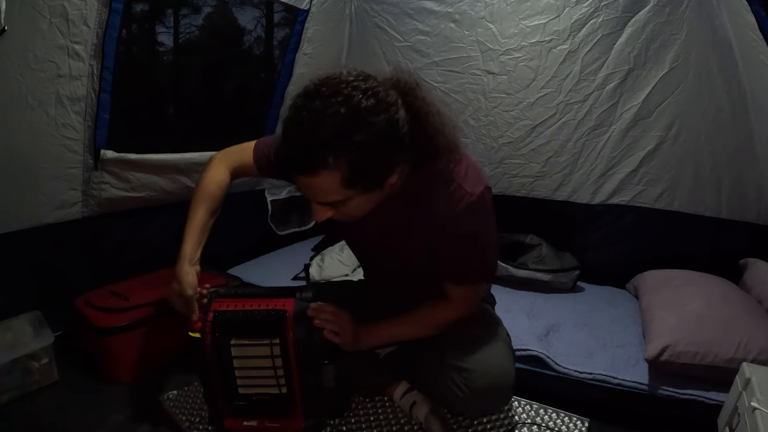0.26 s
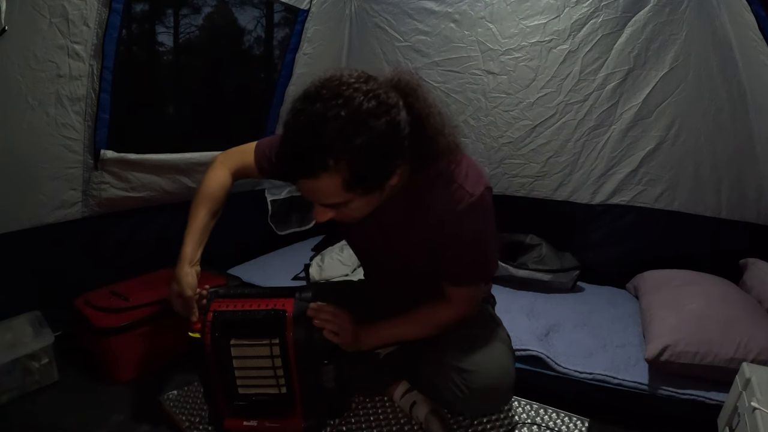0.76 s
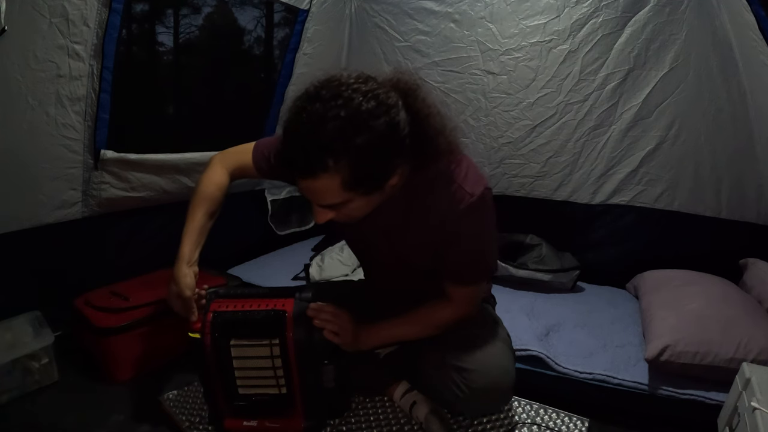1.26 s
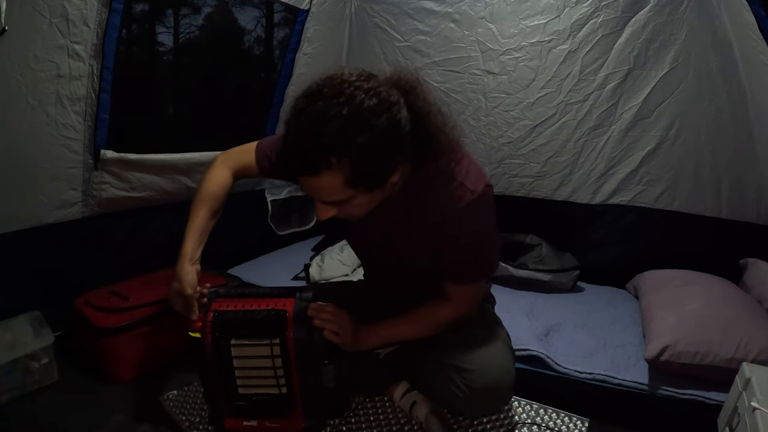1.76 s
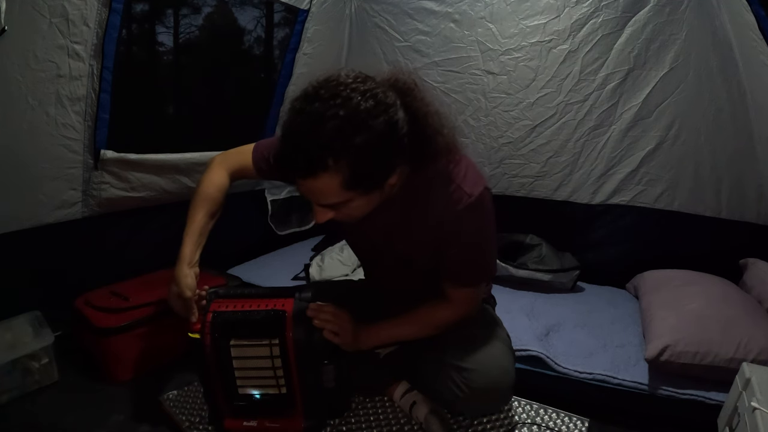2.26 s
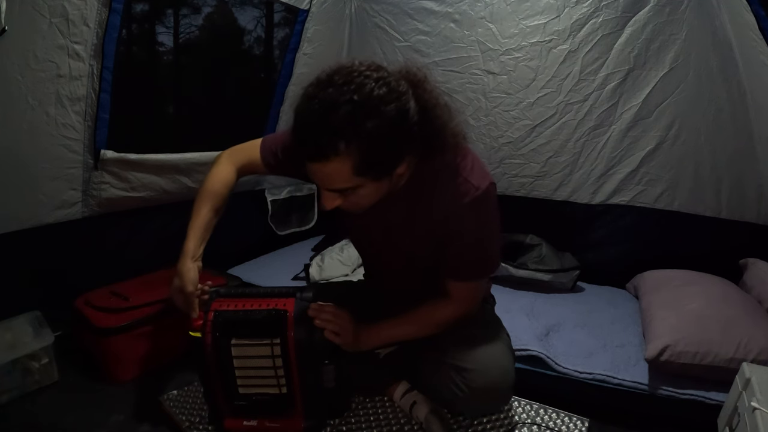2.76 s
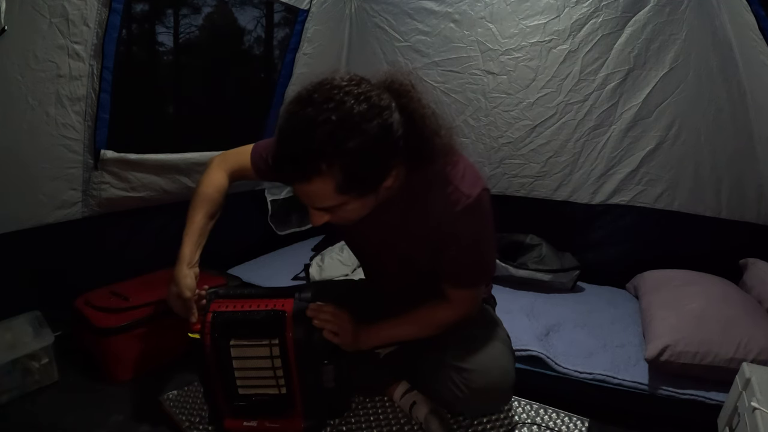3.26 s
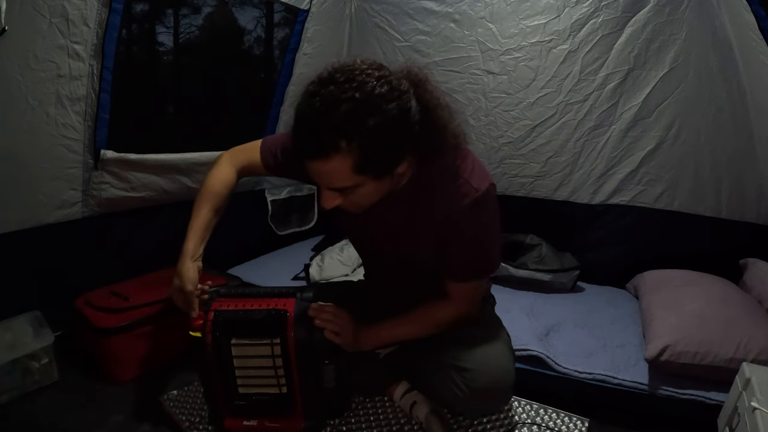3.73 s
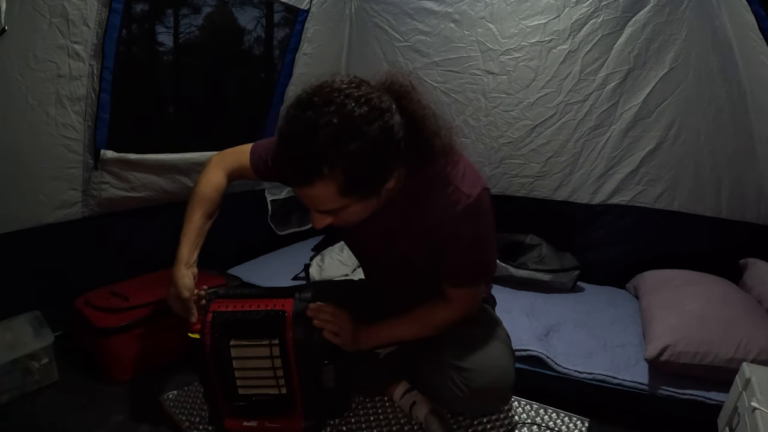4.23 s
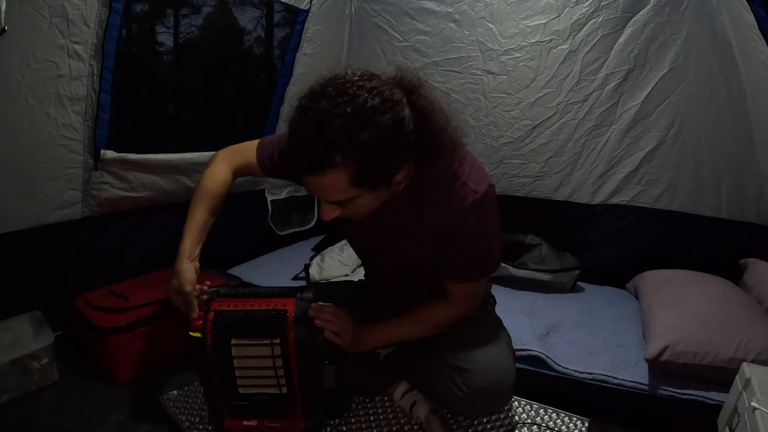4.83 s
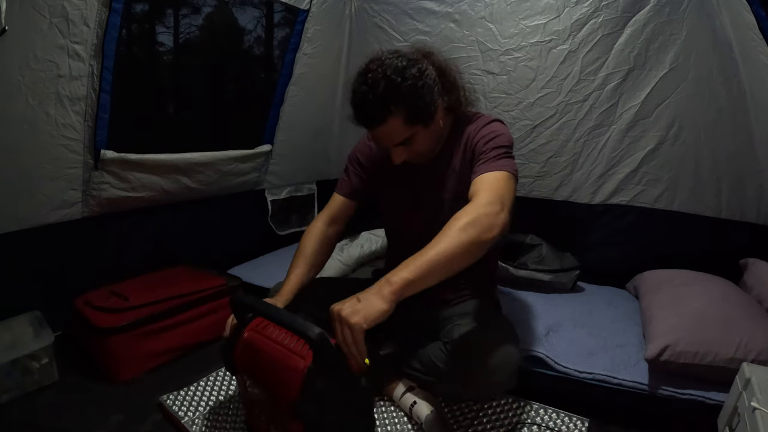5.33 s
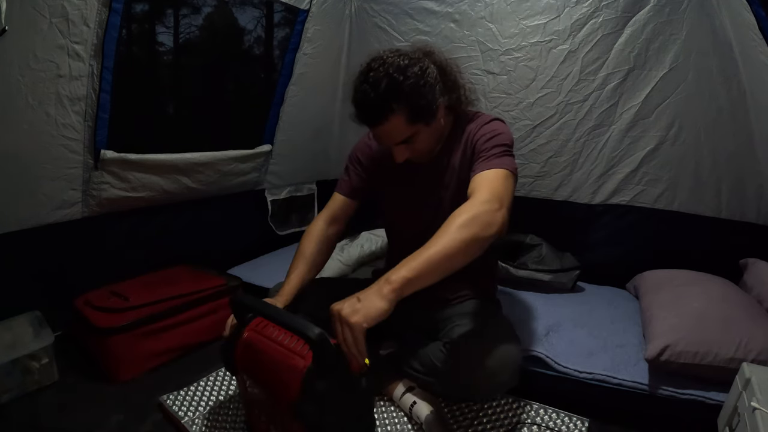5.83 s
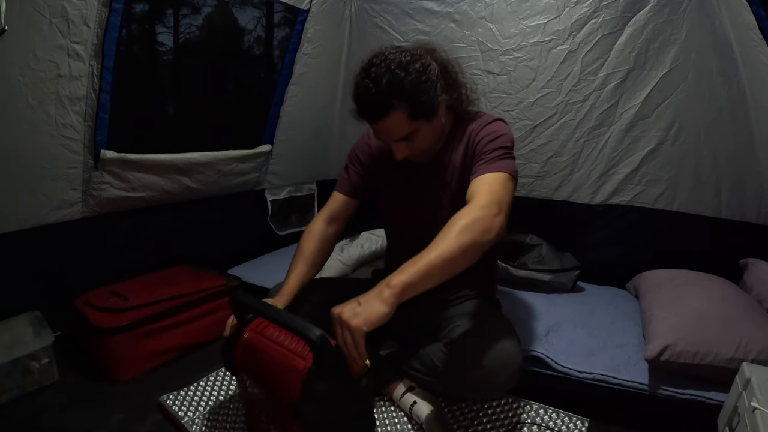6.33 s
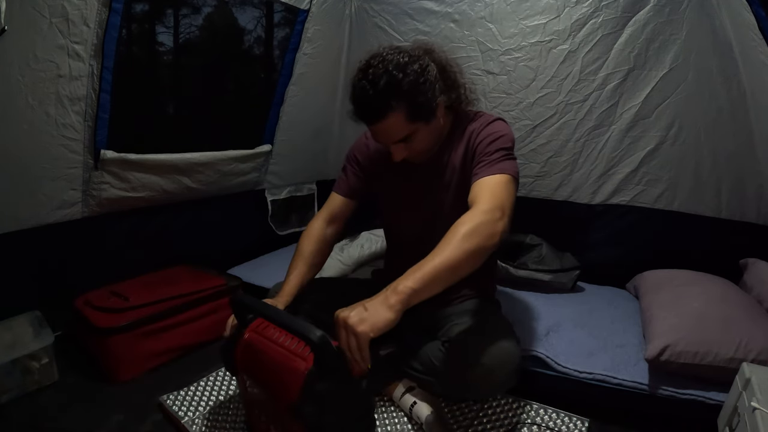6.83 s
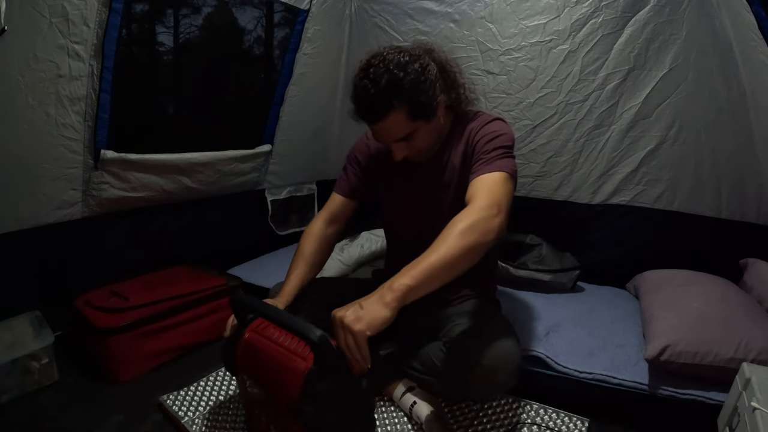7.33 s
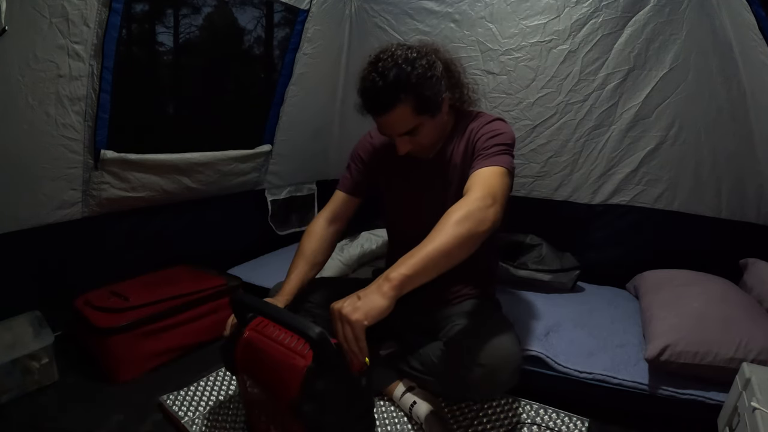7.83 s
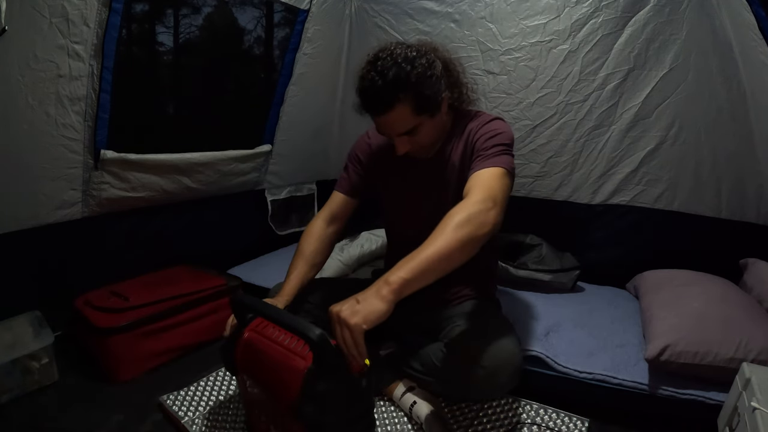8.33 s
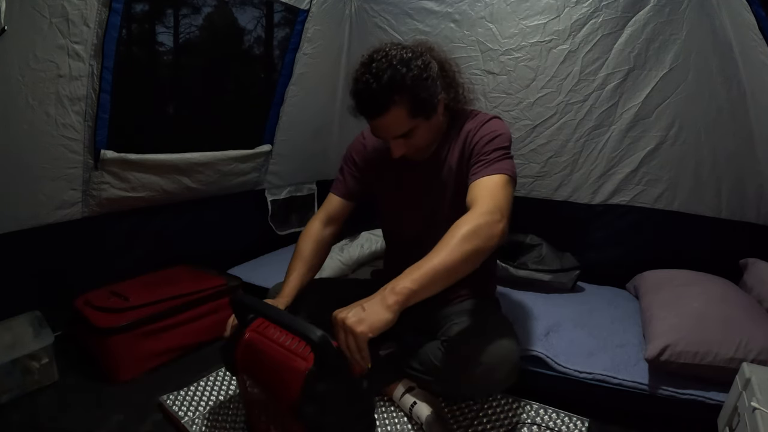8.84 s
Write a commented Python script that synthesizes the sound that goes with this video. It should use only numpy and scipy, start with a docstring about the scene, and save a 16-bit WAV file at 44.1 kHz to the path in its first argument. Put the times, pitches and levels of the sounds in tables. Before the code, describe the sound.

A quiet tent at night, with only faint air noise and a trace of low rumble. A portable gas heater close ahead opens with its button clacking back at 0 s. Then the igniter is pressed: a small tick at 0.3 s, a sharp loud snap at 0.43 s with a brief bright metallic ring and a dull low thud, very faint gas hiss, and a scraping clack of release at 0.93 s. This repeats with snaps near 1.4, 2.3, 3.2, 4.2 and 5.1 s, each followed half a second later by a hollow button clack. The heater is turned around 5.4 s; snaps at 5.5, 6.1, 6.8, 7.5, 8.1 and 8.8 s come faster, ringing with a changed metallic colour, and the returning button is much softer. Thin ringing fades quickly in the dry space; the last faint hiss runs to the end, about 9 s.

```python
"""Piezo igniter in a quiet tent

The igniter of a portable gas heater is pressed twelve times. The button ticks in through tiny slips,
the hammer snaps and rings modes of shell, casing and wire guard, and the button thuds home (noise burst).
Filtered noise hisses as gas until the button scrapes back and clacks; the last hiss runs to the end.
Half way through, the heater is turned and rings differently. Faint air noise and rumble lie beneath."""
import sys
import numpy as np
from scipy import signal
from scipy.fft import rfft, irfft, next_fast_len
from scipy.io import wavfile

SR = 44100
rng = np.random.default_rng(int(sys.argv[2]) if len(sys.argv) > 2 else 0)


def wav_record(signal):
    """Record a signal, one row per channel, as 16-bit PCM in the file named by sys.argv[1]."""
    frames = np.transpose(np.atleast_2d(signal))
    bounded = np.clip(frames, -1, 1)
    # unit amplitude maps onto the largest positive 16-bit level
    quanta = np.round(bounded * 32767).astype(np.int16)
    wavfile.write(sys.argv[1], SR, quanta)


N = 400869

# Still night air. Each row: frequency in Hz, relative density in dB per Hz.
AIR_SPECTRUM = [(25, -31.5), (60, -16), (120, -10.5), (230, -13.5), (320, -8.5), (450, -10), (680, -5.5),
                (900, -15.5), (1100, -8), (1600, -13), (2300, -11.5), (4000, -23.5), (6600, -31.5),
                (9000, -47), (14200, -56)]
# Faint low rumble. Each row: time in seconds, relative level in dB.
RUMBLE_LEVEL = [(0.0, -80), (0.91, -78), (1.34, -65), (1.54, -75.5), (2.51, -67), (3.87, -75),
                (4.93, -70.5), (5.57, -76), (6.38, -71), (7.21, -75), (7.44, -74), (8.61, -80), (9.09, -75)]
# Button let go, scraping back to its stop. Each row: time at the stop in seconds, relative force in dB,
# relative wire guard level in dB, scrape length in seconds, relative scrape level in dB.
RETURNS = [(-.022, -5.5, -19.5, 0.021, -15), (.9322, -7, -28, .023, -14.5),
           (1.886, -5.5, -12.5, 0.023, -16), (2.814, -4.5, -15, 0.02, -14.5),
           (3.7302, -6.5, -22.5, .021, -11), (4.666, -1, -10, 0.033, -12.5),
           (5.253, -27, -14.5, 0.031, -24), (5.574, -14, -4.5, 0.018, -25),
           (5.857, -15.5, -9, 0.027, -19.5), (6.447, -26, -17, 0.064, -31), (7.0929, -17, -13, 0.023, -18),
           (7.773, -20, -3, 0.023, -15.5), (8.4013, -25.5, -31, 0.022, -26)]
# Thumb takes up the button and it catches. Each row: time in seconds, relative tick level in dB,
# push on the body in dB.
CATCHES = [(0.318, -19.5, -44), (1.258, -30.5, -46.5), (2.209, -22.5, -47), (2.751, -23.5, -63),
           (3.095, -48, -52.5), (4.041, -29, -44.5), (4.897, -28.5, -67), (4.995, -21, -43),
           (5.423, -29.5, -54.5), (6.065, -21.5, -44.5), (6.674, -34.5, -48.5), (7.334, -32, -49),
           (7.382, -25, -45.5), (8.023, -32.5, -50), (8.705, -24.5, -47.5), (9.07, -34, -62)]
# Hammer strikes the crystal. Each row: time in seconds, relative jolt of the heater in dB.
SNAPS = [(0.4304, -6), (1.382, -0.5), (2.3066, 2.5), (3.2231, -1.5), (4.169, 0.5), (5.0854, -1.5),
         (5.5003, -1), (6.1381, -13.5), (6.761, 2), (7.4572, 0.5), (8.112, -2.5), (8.7851, 0.5)]
# The two ways the heater faces. Each row: relative force in dB, brightness in dB per octave,
# relative wire guard level in dB, gas level in dB.
FACINGS = [(0.7, -1, 0.6, -59), (1.3, -0.4, 2, -62)]
# Air and panel resonances of the hollow body. Each row: frequency in Hz, t60 in seconds, relative level in dB.
HOLLOW_MODES = [(209, 0.24, -9.5), (295.7, 0.22, -4), (307.2, 0.2, -4), (312, 0.82, -16.5),
                (372.8, 0.23, -1), (573, 0.043, -7.5)]
# Shell modes. Each row: frequency in Hz, t60 in seconds, relative level in dB under the hammer,
# the same once turned, the same under the returning button.
SHELL_MODES = [(1196, 0.09, -27, -26, -28), (1350, 0.16, -30, -45, -30), (1399, 0.16, -31, -35, -29),
               (1514, 0.09, -31, -28, -29), (1812, 0.09, -34, -37, -25), (2079, 0.16, -23, -23, -32),
               (2111, 0.16, -16, -21, -23), (2313, 0.09, -30, -21, -25), (2396, 0.21, -26, -27, -39),
               (2461, 0.09, -18, -23, -31), (2552, 0.16, -23, -32, -32), (2611, 0.09, -21, -12, -33),
               (2643, 0.21, -35, -24, -44), (2705, 0.09, -19, -19, -30), (2793, 0.09, -21, -20, -30),
               (2950, 0.09, -21, -27, -32), (3116, 0.09, -29, -21, -27), (3330, 0.09, -20, -26, -27),
               (3507, 0.09, -20, -21, -29), (3622, 0.09, -22, -27, -25), (3736, 0.21, -26, -33, -35),
               (3888, 0.09, -22, -17, -28), (4316, 0.09, -22, -34, -30), (4500, 0.09, -23, -26, -25),
               (4709, 0.09, -20, -28, -33), (4836, 0.09, -16, -22, -35), (4936, 0.09, -25, -21, -34),
               (5065, 0.09, -29, -23, -36), (5276, 0.09, -36, -20, -34), (5404, 0.09, -40, -21, -40)]
# Long modes of wire guard and frame. Each row: frequency in Hz, t60 in seconds, relative level in dB,
# the same once turned.
GUARD_MODES = [(1523, 1.2, -60, -64), (1615, 1.3, -60, -66), (1997, 1.3, -55, -55), (2035, 1.2, -54, -55),
               (2089, 1.9, -48, -57), (2105, .6, -51, -48), (2153, 1.1, -52, -57), (2327, .6, -56, -52),
               (2654, .45, -54, -49), (2730, .55, -48, -43), (2781, .45, -50, -41), (3252, 1.2, -60, -63),
               (3510, .3, -48, -44), (3741, 1.1, -60, -62), (4150, .8, -56, -68), (4565, 1.1, -55, -73),
               (4603, .5, -50, -68), (4743, .45, -58, -52), (5195, .95, -49, -66), (5500, .22, -52, -36),
               (6298, .25, -58, -50), (6912, .45, -61, -64), (7865, .45, -67, -68), (8350, .45, -69, -68),
               (10430, .5, -70, -86), (10570, .5, -76, -70), (11200, .4, -70, -68)]
# Crowded short modes of casing and fittings. Each row: frequency in Hz, t60 in seconds,
# relative density in dB per Hz under the hammer, the same once turned, the same under the button.
CASING_BANDS = [(60, 0.059, -31, -34.5, -36.5), (182, 0.27, -28, -19, -25.5),
                (354.4, 0.46, -17.5, -26.5, -15.5), (615, 0.4, -19.5, -19, -21.5),
                (1050, 0.26, -17, -15, -13), (1490, 0.3, -11.5, -18, -12), (2300, 0.21, -7.5, -6, -11.5),
                (3520, 0.18, -5, -6.5, -12), (5000, 0.14, -6, -8.5, -13), (6210, 0.14, -14, -15, -21.5),
                (8220, 0.13, -22.5, -26, -30.5), (9030, 0.14, -27.5, -30.5, -40.5),
                (10840, 0.11, -14.5, -15, -25), (14940, 0.19, -45, -48, -65)]
# Dull jolt of the heater on the ground. Each row: frequency in Hz, relative density in dB per Hz.
JOLT_SPECTRUM = [(30, -36.5), (75, -15.5), (130, 0), (200, 1.5), (320, 2), (480, -10.5), (900, -37),
                 (2000, -76.5)]
# Pilot tube resonances. Each row: frequency in Hz, half width in Hz, relative level in dB.
PILOT_MODES = [(1964, 50, -3), (3240, 170, 1.5), (3520, 430, -13), (4930, 68, -11), (4900, 180, -8)]
# Left-right difference. Each row: frequency in Hz, level in dB relative to the common sound.
SIDE_SPECTRUM = [(40, -24.5), (150, -32), (500, -34.5), (2000, -52.5), (4000, -45), (7000, -25),
                 (10500, -12.5), (13000, -10)]

AIR_DB = -60
TURNED_AT_S = 5.4
HOME_S = 0.051  # snap to button thudding home
GAS_LEAD_S = 0.066  # valve opens this long before the snap
CATCH_S, PUSH_LAG_S, PUSH_S = 0.024, 0.04, 0.053  # tick length; delay and length of the push after it
# Tick brightness in dB per octave at the firm push, and its loss per dB of push.
FIRM_PUSH_DB, FIRM_SLOPE_DB, DULLING_PER_DB = -48.5, -2.5, 0.35
SCRAPE_SLOPE_DB = -3.5  # dB per octave
HARDENING_PER_DB = 0.22  # harder landing is brighter: dB per octave for each dB of force
KNOCK_SHARE = 0.35  # share of the force, in dB, followed by the hollow knock
RASP_DB, RASP_SLOPE_DB, RASP_LAG_S, RASP_S = -32, 9.5, 0.014, 0.012  # thin rasp as the button settles
GUARD_SLOPE_DB = -6  # dB per octave: soft button landing favours the low guard modes
EDGE_HZ = 14100


def amp(db):
    """Decibels to gain."""
    return 10 ** (np.asarray(db) / 20)


def unit(x):
    """Scales to rms 1."""
    return x / np.sqrt(np.mean(x ** 2) + 1e-20)


def add(mix, at_s, sound):
    """Mixes a sound in at a time; what falls outside the mix is cut."""
    start = round(at_s * SR)
    sound = sound[max(-start, 0):]
    part = mix[max(start, 0):][:len(sound)]
    part += sound[:len(part)]


def colour(x, hz, db):
    """Filters by a spectrum drawn on a log-frequency axis."""
    f = np.fft.rfftfreq(len(x), 1 / SR)
    gain = amp(np.interp(np.log(f + 1), np.log(hz), db))
    return irfft(rfft(x) * gain, len(x))


def brighten(x, slope_db):
    """Tilts the spectrum about 2800 Hz, by dB per octave, as a harder contact does."""
    hz = np.array([600, 12000])
    return colour(x, hz, slope_db * np.log2(hz / 2800))


def ring(modes, column, length_s, rise_s=0.00098):
    """Sum of decaying sine modes in random phase, with the levels of one column."""
    t = np.arange(int(length_s * SR)) / SR
    total = np.zeros(len(t))
    for hz, t60_s, *levels_db in modes:
        decay = amp(levels_db[column] - 60 * t / t60_s)
        total += decay * np.sin(2 * np.pi * (hz * t + rng.random()))
    return total * (1 - np.exp(-t / rise_s))


def clatter(column, crack_db, crack_s, tent_db, tent_t60_s,
            crack_hz=3800, treble_lag_s=0.0024, lumps_db=1.5):
    """Dense short modes as noise bands: a crack, a decay by band, and the faint tail of the tent."""
    t = np.arange(SR) / SR
    hz, t60_s, *levels_db = np.transpose(CASING_BANDS)
    noise = rfft(colour(rng.standard_normal(SR), hz, levels_db[column]))
    log_f = np.log(np.arange(len(noise)) + 1)
    out = np.zeros(SR)
    for centre_hz, band_t60_s, share in zip(hz, t60_s, np.eye(len(hz))):
        band = irfft(noise * np.interp(log_f, np.log(hz), share), SR)
        tail_db = tent_db - 9 * max(np.log2(centre_hz / 4000), 0)  # cloth swallows the treble
        fade = np.hypot(amp(-60 * t / band_t60_s), amp(tail_db - 60 * t / tent_t60_s))
        crack_gain = amp(crack_db - 3.2 * abs(np.log2(centre_hz / crack_hz)))
        crack = crack_gain * np.exp(-(t / crack_s) ** 2)
        # about a cycle to build up; the top arrives by reflection
        rise_s = 1 / centre_hz + treble_lag_s * (centre_hz > 7000)
        out += band * (fade + crack) * (1 - np.exp(-t / rise_s))
    lumps = np.interp(t, np.linspace(0, 1, 500), rng.standard_normal(500))
    return out * amp(lumps_db * lumps)  # random level lumps roughen the decay


def swell(x, length_s):
    """Soft bell-shaped burst of a steady sound, centred in it, levelled to rms 1 under the bell."""
    t = (np.arange(len(x)) - len(x) / 2) / SR
    bell = np.exp(-2 * (t / length_s) ** 2)
    burst = x * bell
    return burst / np.sqrt(np.sum(burst ** 2) / np.sum(bell ** 2))


def night(rumble_db=2):
    """Even background air noise and a low rumble of wandering level."""
    size = next_fast_len(N)
    air = unit(colour(rng.standard_normal(size), *np.transpose(AIR_SPECTRUM)))[:N]
    low_noise = colour(rng.standard_normal(size), hz=[25, 58, 120, 300, 900],
                       db=[-22.0, 2.5, -3.5, -17.5, -67.5])
    level_db = np.interp(np.arange(N) / SR, *np.transpose(RUMBLE_LEVEL))
    rumble = unit(low_noise)[:N] * amp(level_db)
    return amp(AIR_DB) * air + amp(rumble_db) * rumble


def slide(tick, length_s, slope_db, rub=0.13, first=0.32, grains_per_s=600):
    """Stick-slip friction: a first catch, then a random run of tiny slips that die away."""
    t = np.arange(SR // 4) / SR
    chance, size = rng.random(len(t)), rng.standard_normal(len(t))
    slips = rub * size * (chance < grains_per_s / SR)
    slips *= np.exp(-(t / length_s) ** 2 / 2)
    slips[0] = first
    return brighten(signal.fftconvolve(tick, slips)[:SR], slope_db)


def button(guards, shell_db=3, casing_db=-4.0, knock_db=-30, change=0.4, damping_db_per_s=170):
    """Button ticks on its way in; let go, it scrapes back and lands with a duller clack and hollow knock."""
    out, t = np.zeros(N), np.arange(SR) / SR

    def casing():
        """Casing modes under the button, drawn afresh."""
        return clatter(column=2, crack_db=6.5, crack_s=0.011, tent_db=-28.5, tent_t60_s=0.42)

    shell = ring(SHELL_MODES, column=2, length_s=1)
    clack = amp(shell_db) * shell + amp(casing_db) * casing()
    knock = amp(knock_db) * ring(HOLLOW_MODES, column=0, length_s=1, rise_s=0.02)
    tick = clack * amp(-damping_db_per_s * t)  # thumb damps the ring
    for s, db, push_db in CATCHES:
        slope_db = FIRM_SLOPE_DB - DULLING_PER_DB * (push_db - FIRM_PUSH_DB)
        add(out, s, amp(db) * slide(tick, CATCH_S, slope_db))
    for s, db, guard_db, scrape_s, scrape_db in RETURNS:
        scrape = slide(tick, scrape_s, SCRAPE_SLOPE_DB, rub=0.19, first=0.25)
        add(out, s - scrape_s, amp(scrape_db) * scrape)
        landing = brighten(clack + change * casing(), HARDENING_PER_DB * db)
        add(out, s, amp(db) * landing + amp(KNOCK_SHARE * db) * knock)
        guard = brighten(guards[int(s > TURNED_AT_S)], GUARD_SLOPE_DB)
        add(out, s, amp(db + guard_db) * guard)
        add(out, s + RASP_LAG_S, amp(RASP_DB) * slide(tick, RASP_S, RASP_SLOPE_DB))
    return out


def pushes(easing_db=-56, easing_lead_s=0.015, easing_s=0.043):
    """Grip tightens after each catch and eases before each return, stirring the low body resonances."""
    out, f = np.zeros(N), np.fft.rfftfreq(SR // 2, 1 / SR)
    half_s = 1 / 4  # burst centre
    body = sum(amp(db) / (1 + ((f - hz) * t60_s / 5.1) ** 2) for hz, t60_s, db in HOLLOW_MODES)

    def stir(length_s):
        """Noise burst through the body resonances."""
        return swell(irfft(rfft(rng.standard_normal(SR // 2)) * body), length_s)

    for s, _, push_db in CATCHES:
        add(out, s + PUSH_LAG_S - half_s, amp(push_db) * stir(PUSH_S))
    for s, *_ in RETURNS:
        add(out, s - easing_lead_s - half_s, amp(easing_db) * stir(easing_s))
    return out


def gas(opening_s=0.01, waver_db=0.5, waver_s=0.082):
    """Jet noise through pilot tube resonances, unsteady, from before each snap until the button is back."""
    size, t = next_fast_len(N), np.arange(N) / SR
    f = np.fft.rfftfreq(size, 1 / SR)
    power = sum(amp(db) ** 2 / (1 + ((f - hz) / width_hz) ** 2) ** 2 for hz, width_hz, db in PILOT_MODES)
    jet = unit(irfft(rfft(rng.standard_normal(size)) * np.sqrt(power), size))[:N]
    flow = np.zeros(N)
    for s, _ in SNAPS:
        *_, gas_db = FACINGS[int(s > TURNED_AT_S)]
        shut_s = min((back_s for back_s, *_ in RETURNS if back_s > s), default=N / SR)
        inside_s = np.minimum(t - s + GAS_LEAD_S, shut_s - t)  # time from the nearer end
        flow += amp(gas_db) * np.clip(inside_s / opening_s, 0, 1)
    waver = np.interp(t / waver_s, np.arange(1000), rng.standard_normal(1000))
    return jet * flow * amp(waver_db * waver)


def jolt(length_s):
    """Dull thud of low noise, centred in half a second."""
    return swell(colour(rng.standard_normal(SR // 2), *np.transpose(JOLT_SPECTRUM)), length_s)


def snaps(guards, shell_db=-1.0, casing_db=-4.5, lead_db=-29, lead_s=0.014, swell_s=0.0038,
          recoil_db=-36, recoil_s=0.008, home_db=-38, change=0.22):
    """Spring hammer gives nearly the same blow each time; heater recoils, button bottoms out."""
    out = np.zeros(N)
    half_s = 1 / 4  # jolt centre
    swelling = 1 - np.exp(-np.arange(SR) / SR / swell_s)

    def casing(column):
        """Casing modes under the hammer, drawn afresh."""
        return clatter(column, crack_db=-3, crack_s=0.0082, tent_db=-31, tent_t60_s=0.86)

    blows = []
    for column in range(2):
        shell = ring(SHELL_MODES, column, 1)
        blows.append(amp(shell_db) * shell + amp(casing_db) * casing(column))
    for s, jolt_db in SNAPS:
        pose = int(s > TURNED_AT_S)
        db, slope_db, guard_db, _ = FACINGS[pose]
        fresh = casing(pose)  # fresh noise varies each snap a little
        lead_in = brighten(fresh, slope_db=-2.0) * swelling  # faint noise swells just before each snap
        add(out, s - lead_s, amp(db + lead_db) * lead_in)
        add(out, s, amp(db) * brighten(blows[pose] + change * fresh, slope_db))
        add(out, s, amp(db + guard_db) * guards[pose])
        add(out, s + recoil_s - half_s, amp(jolt_db + recoil_db) * jolt(0.013))
        add(out, s + HOME_S - half_s, amp(jolt_db + home_db) * jolt(0.024))
    return out


def sides(x, scatter_s=0.002):
    """Nearby things scatter the sound a little differently to left and right, most in the treble."""
    t = np.arange(SR // 50) / SR
    taps = rng.standard_normal(len(t)) * np.exp(-t / scatter_s)
    scattered = signal.oaconvolve(x, taps / np.linalg.norm(taps))[:N]
    padded = np.pad(scattered, (0, next_fast_len(N) - N))
    side = colour(padded, *np.transpose(SIDE_SPECTRUM))[:N]
    return np.array([x + side, x - side])


def scene():
    """Heater straight ahead; hammer and button share the guard's ring for each facing."""
    guards = [ring(GUARD_MODES, column, 1.8) for column in range(2)]
    return sides(night() + button(guards) + pushes() + gas() + snaps(guards))


def record(dry):
    """Rounds off the highest peaks, then limits the band."""
    rounded = dry / (1 + (dry / 1.05) ** 8) ** (1 / 8)
    lowpass = signal.firwin(127, EDGE_HZ, window=("kaiser", 9), fs=SR)
    return signal.oaconvolve(rounded, lowpass[None], "same")


dry = scene()
out = record(dry)
wav_record(out)
```